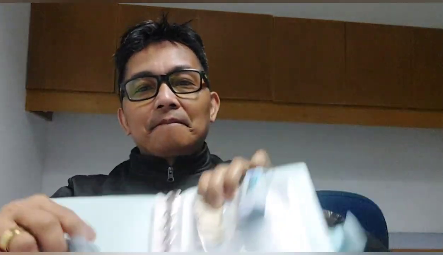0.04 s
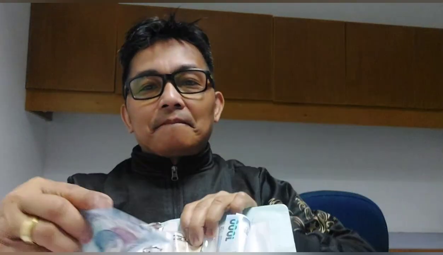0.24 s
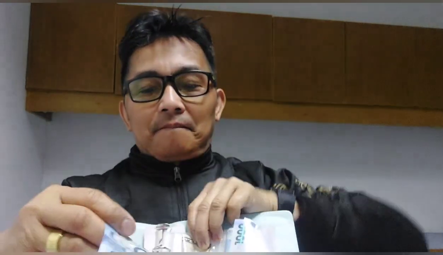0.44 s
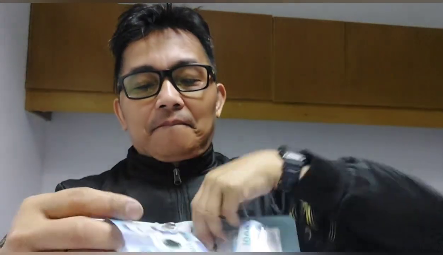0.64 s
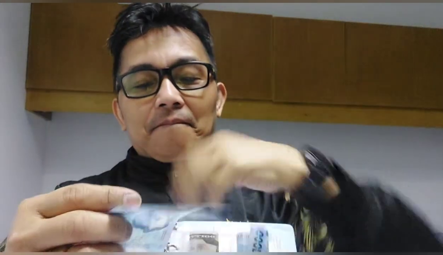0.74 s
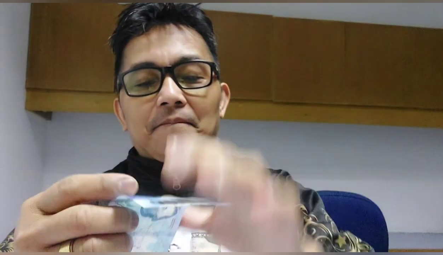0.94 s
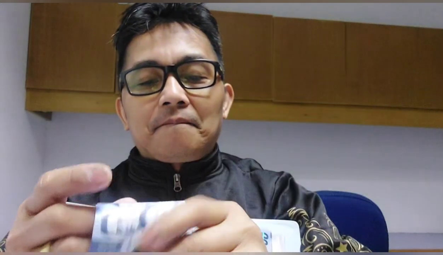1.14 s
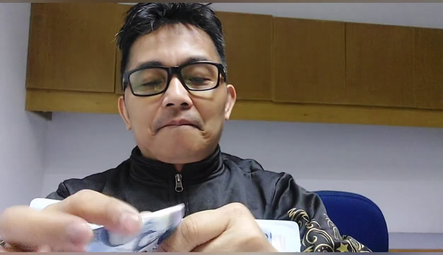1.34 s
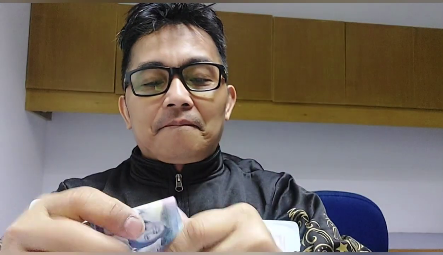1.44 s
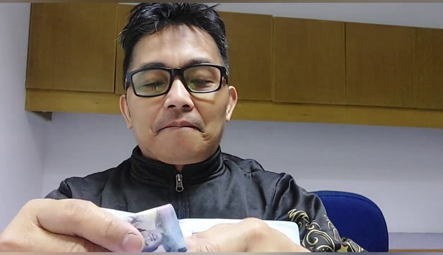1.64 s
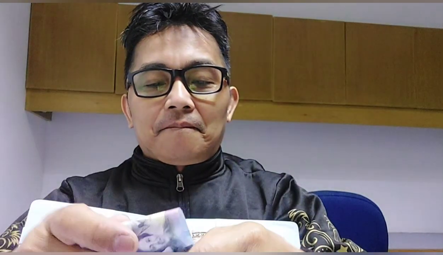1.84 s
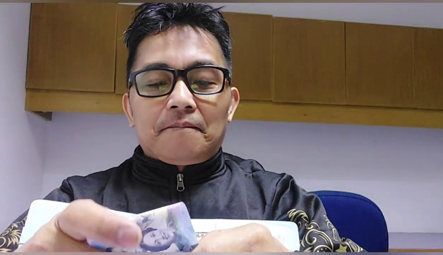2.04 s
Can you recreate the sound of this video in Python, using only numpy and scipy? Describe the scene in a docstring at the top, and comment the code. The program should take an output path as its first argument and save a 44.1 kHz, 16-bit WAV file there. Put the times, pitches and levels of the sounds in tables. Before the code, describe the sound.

Plastic sleeves and a paper banknote crinkle and snap after a binder thuds on a desk

```python
"""Fine crackle of sliding sheets comes first, then a low thud as a binder drops on the desk.
Hands work a banknote and clear plastic pockets in a small room: crackle swells, snaps, scuffs, knocks.
Sheets: random clicks and noise bursts ringing damped modes. Binder: a sagging sine over desk modes.
Ventilation rumble and faint hiss, shaped from random spectra, lie under it all."""
import sys
import numpy as np
from scipy import signal
from scipy.fft import rfft, irfft
from scipy.io import wavfile
from scipy.ndimage import uniform_filter1d

SR = 44100
rng = np.random.default_rng(int(sys.argv[2]) if len(sys.argv) > 2 else 0)


def volts_from_decibels(level):
    """Turn decibel levels (scalar or array-like) into linear amplitude factors."""
    exponent = np.asarray(level, float) / 20
    return 10 ** exponent


def generate_wav(sig):
    """Save sig (samples, or channels by samples) to the path in sys.argv[1] as 16-bit PCM at SR."""
    pcm = np.round(np.clip(np.atleast_2d(sig).T, -1, 1) * 32767).astype(np.int16)
    wavfile.write(sys.argv[1], SR, pcm)


N = 92610


def evened(x):
    """Scale to unit rms."""
    return x / np.sqrt(np.mean(x ** 2) + 1e-20)


def read_curve(points, hz):
    """Interpolate (f/Hz, value) points over log frequency."""
    f, value = np.transpose(points)
    return np.interp(np.log(hz + 1), np.log(f + 1), value)


def add(mix, start_s, sound):
    """Add sound in place from start_s, cut at the end of the mix."""
    part = mix[..., round(start_s * SR):][..., :sound.shape[-1]]
    part += sound[..., :part.shape[-1]]


def partner(a, b, likeness):
    """Second channel: a blended with independent b to the given correlation."""
    return likeness * a + np.sqrt(1 - likeness ** 2) * b


def highpass(x, order, cutoff_hz):
    """Butterworth high-pass."""
    return signal.sosfilt(signal.butter(N=order, Wn=cutoff_hz, btype="high", fs=SR, output="sos"), x)


RING_RISE_S = .0002


def ring(modes, detune, spread_db):
    """Response to one click: damped sines, pitch and level of each drawn anew."""
    hz, db, t60_s = np.transpose(modes)[:, :, None]
    level_chance, pitch_chance = rng.standard_normal((2, len(modes), 1))
    t = np.arange(1024) / SR
    envelope = volts_from_decibels(db + spread_db * level_chance - 60 * t / t60_s)
    sines = np.sin(2 * np.pi * hz * (1 + detune * pitch_chance) * t)
    return (envelope * sines).sum(0) * np.minimum(t / RING_RISE_S, 1)


# Modes of the sheets, low to high: f/Hz, level/dB, t60/s
FLAP_MODES = [(1200, -6, .012), (1410, -1, .016), (1680, 0, .016), (1860, -6, .012)]
PAPER_MODES = [(2320, 0, .015), (2600, -2, .015), (2930, 0, .015), (3350, -4, .012), (3750, -3, .012)]
CREASE_MODES = [(4300, -4, .006), (4900, -3, .005), (5500, -2, .005), (6200, -3, .005), (6900, -4, .005),
                (7700, -5, .004)]
FILM_MODES = [(8540, -6.5, 0.0017), (9670, -5.5, 0.0027), (10680, -4, 0.0023), (11570, -2, 0.0028),
              (12270, 1, 0.0028), (13000, -11, 0.0024), (14700, -1.5, 0.0022), (15460, -3, 0.003)]
# Sliding swells: t/s, paper level/dB, flap re paper/dB, film level/dB
SLIDE_LEVELS = [(0, -50, 3.5, -45), (0.03, -67.5, 3, -67), (0.06, -73.5, -5, -65.5), (0.098, -75, -3, -51),
                (0.123, -48, 0, -48.5), (0.15, -63, 7.5, -61), (0.18, -69, -55, -58.5),
                (0.205, -72, 7, -66), (0.212, -51, -1, -41), (0.24, -52, -8, -54), (0.27, -67.5, 3, -61),
                (0.32, -63.5, -11, -66.5), (0.333, -59, 5, -53), (0.38, -69, 2, -56.5),
                (0.44, -67, 1.5, -65.5), (0.54, -67, 4, -52.5), (0.6, -72, 2, -71), (0.638, -64, 4, -54.5),
                (0.719, -59, -12, -66.5), (0.735, -50, -3, -49), (0.77, -49, -2.5, -61),
                (0.8, -62.5, -2, -67), (0.87, -93, 14, -70.5), (1.01, -81.5, 3, -72), (1.048, -59, -6, -70),
                (1.101, -65.5, 10, -60), (1.113, -48, 1, -57), (1.145, -56, 1.5, -53.5),
                (1.18, -58.5, -6, -59.5), (1.219, -52, 2, -46), (1.25, -49.5, -3, -49),
                (1.279, -58.5, -1, -63), (1.31, -54, 4, -47), (1.339, -45.5, -4, -36.5),
                (1.362, -37, -2.5, -41.5), (1.377, -59, 15, -29.5), (1.398, -43, -48, -49.5),
                (1.44, -65.5, 2, -61), (1.46, -44.5, 2, -50), (1.473, -38, -5, -61), (1.499, -51, -29, -45),
                (1.53, -48, -3, -48), (1.56, -58.5, -23, -51), (1.585, -57.5, -11, -63.5),
                (1.62, -74, 5, -60), (1.66, -63, -11, -73), (1.72, -65, -36, -63.5), (1.8, -60, -5, -56.5),
                (1.84, -52.5, -16, -62.5), (1.9, -59.5, -2, -61.5), (2.0, -58.5, -15, -63),
                (2.04, -62.5, -9, -57.5), (2.1, -59, -57, -69.5)]
# Crackling of flap, paper, creases, film: rate/(clicks/s), spread of sizes/dB
CRACKLE_RATES = [(1200, 4.), (1800, 4.), (5000, 3.), (14000, 1.5)]
CREASE_DB = 1  # re mean of paper and film dB
SLIDE_WIDTH_RAD = 0.59
SPOT_DETUNE, SPOT_SPREAD_DB = .035, 3.


def slide():
    """Dense random crackles at eight spots, each with its own ring and stereo place."""
    t, out = np.arange(N) / SR, np.zeros((2, N))
    s, paper_db, flap_re_paper_db, film_db = np.transpose(SLIDE_LEVELS)
    crease_db = (paper_db + film_db) / 2 + CREASE_DB
    mode_sets = (FLAP_MODES, PAPER_MODES, CREASE_MODES, FILM_MODES)
    levels_db = (paper_db + flap_re_paper_db, paper_db, crease_db, film_db)
    for modes, (rate, spread_db), level_db in zip(mode_sets, CRACKLE_RATES, levels_db):
        swell = volts_from_decibels(np.interp(t, s, level_db))
        for side in np.linspace(-1, 1, 8):
            size = volts_from_decibels(spread_db * np.minimum(rng.exponential(1, N), 6))
            size *= rng.random(N) < rate / 8 / SR  # sparse click times
            clicks = evened(size) * rng.choice([-1., 1.], N) * swell
            tone = ring(modes, SPOT_DETUNE, SPOT_SPREAD_DB)
            heard = signal.oaconvolve(clicks, tone / np.linalg.norm(tone) / 2)[:N]
            angle = np.pi / 4 + SLIDE_WIDTH_RAD * side
            out[0] += np.cos(angle) * heard
            out[1] += np.sin(angle) * np.roll(heard, round(7 * side))  # samples
    return out


# Snaps of the sheets: t/s, level/dB, ring centre f/Hz, film re ring/dB, length/s
SNAPS_OF_SHEETS = [(0.116, -49, 1730, -20, 0.0031), (0.2044, -35, 5160, -4, 0.0048),
                   (.215, -41, 5470, 0, 0.0023), (0.23, -31.5, 5500, -3.5, 0.0021),
                   (0.291, -60, 4000, 12.5, 0.0027), (.325, -56.5, 7560, 17, 0.0029),
                   (0.33, -46.5, 7800, -2, 0.0039), (0.6967, -41, 5970, -22, 0.00095),
                   (.7275, -31.5, 4000, -0.5, 0.001), (.751, -28.5, 4430, 8, 0.0021),
                   (0.7537, -33.5, 3270, 6.5, 0.0028), (0.8458, -43.5, 5500, -15, 0.0025),
                   (0.973, -57, 5500, -12, 0.0028), (1.086, -40.5, 1610, -16, 0.0057),
                   (1.106, -41.5, 1710, 2, 0.0083), (1.134, -36, 1450, -20, 0.0021),
                   (1.2406, -29.5, 2690, -37, 0.005), (1.308, -41, 1980, -16, 0.0018),
                   (1.329, -42, 3000, -10, 0.0072), (1.345, -35, 2600, -25, 0.0021),
                   (1.373, -29, 3000, -2, 0.0071), (1.374, -29, 6300, -4.5, 0.0059),
                   (1.4599, -21, 1860, -38, 0.0032), (1.463, -23.5, 2700, -24, 0.003),
                   (1.4635, -25, 5900, -8, 0.0043), (1.467, -33.5, 1870, -12, 0.0018),
                   (1.488, -53, 1990, 18, 0.0043), (1.5113, -24, 1750, -35, 0.0015),
                   (1.512, -29.5, 2900, -25, 0.0041), (1.525, -37, 2970, 1.5, 0.00067),
                   (1.553, -43.5, 3150, 6.5, 0.003), (1.762, -42, 1270, -29, 0.00096),
                   (1.7626, -45.5, 3400, -36, 0.004), (1.85, -42.5, 3200, -25, 0.0024),
                   (1.8274, -32, 2490, -30, 0.0036), (1.831, -33, 3900, -23, 0.0043)]
SNAP_WIDTH_OCT, SNAP_RISE_S = .42, .001
SNAP_DETUNE, SNAP_SPREAD_DB = .025, 1.5
RING_LIKENESS, FILM_LIKENESS = .65, .2  # left-right, before the ring


def snap(start_s, level_db, centre_hz, film_db, length_s):
    """A short shower of tiny buckles, fading fast, rings the modes near its centre and the film."""
    t = np.arange(800) / SR
    envelope = np.minimum(t / SNAP_RISE_S, 1) * np.exp(-(t / np.clip(length_s, .0005, .012)) ** 4)
    a, b = rng.standard_normal((2, len(t))) * envelope
    near = []
    for hz, db, t60_s in FLAP_MODES + PAPER_MODES + CREASE_MODES:
        octaves = np.log2(hz / centre_hz)
        near.append((hz, db - 6 * (octaves / SNAP_WIDTH_OCT) ** 2, t60_s))
    out = 0
    for modes, db, likeness in ((near, 0, RING_LIKENESS), (FILM_MODES, film_db, FILM_LIKENESS)):
        tone = ring(modes, SNAP_DETUNE, SNAP_SPREAD_DB)
        part = signal.fftconvolve([a, partner(a, b, likeness)], tone[None], axes=1)
        loudest = np.sqrt(2 * uniform_filter1d(part ** 2, 88).max())  # over 2 ms
        out = out + volts_from_decibels(db) * part / loudest
    return start_s, out * volts_from_decibels(level_db)


# Scuffs on the binder cover: t/s, level/dB, decay constant/s
COVER_SCUFFS = [(0.118, -54, 0.069), (0.208, -47.5, 0.078), (0.249, -54.5, 0.084), (0.728, -46.5, 0.019),
                (0.75, -42.5, 0.018), (0.801, -52, 0.029), (1.199, -50, 0.059), (1.346, -51.5, 0.033),
                (1.458, -42, 0.026), (1.471, -64, 0.035)]
# Cover modes: f/Hz, level/dB, t60/s
COVER_MODES = [(432, 3, 0.021), (500, 2.5, 0.017), (673, -1, 0.019), (830, -4, 0.011)]


def scuff(start_s, level_db, decay_s):
    """A brief rub, quick to start and slow to fade, sounds in the low modes of the cover."""
    t = np.arange(0, 2 * decay_s, 1 / SR)
    rub = rng.standard_normal((2, 8000))[:, :len(t)] * np.minimum(t / .002, 1) * np.exp(-t / decay_s)
    tone = ring(COVER_MODES, 0.032, 1.7)
    tone = tone / np.linalg.norm(tone)
    stereo_rub = [rub[0], partner(rub[0], rub[1], RING_LIKENESS)]
    return start_s, volts_from_decibels(level_db) * signal.fftconvolve(stereo_rub, tone[None], axes=1)


# Knocks on the desk: t/s, binder level/dB, binder starting f/Hz, desk level/dB
DESK_KNOCKS = [(0.2074, -20.5, 152.4, -33), (0.244, -48, 147, -32.5), (.272, -31, 178.4, -42),
               (.345, -44.5, 153, -38), (.368, -46, 229, -41), (.668, -42.5, 141.8, -46),
               (0.753, -44, 213, -44), (.808, -48, 147, -41), (1.204, -43.5, 149, -47),
               (1.835, -42, 150, -50.5), (1.464, -43, 223.7, -45)]
# Desk-top modes: f/Hz, level/dB, t60/s
DESK_MODES = [(52.3, -11, 0.73), (62.2, 2, 0.24), (118.44, 2, 0.38), (207, -9, 0.16), (244.5, -8, 0.18),
              (288.8, -9, 0.18), (356.8, -8, 0.17)]
BINDER_SAG_PER_S = 2.4  # pitch falls as the cushion of air empties
BINDER_T60_S, KNOCK_RISE_S, DESK_RISE_S = 0.21, 0.0015, 0.0117


def knock(start_s, binder_db, binder_hz, desk_db):
    """The binder's air cushion thumps with sagging pitch and the desk top swells into a low ring."""
    t = np.arange(0, .5, 1 / SR)
    cycles = binder_hz * np.cumsum(np.exp(-BINDER_SAG_PER_S * t)) / SR
    binder = volts_from_decibels(binder_db - 60 * t / BINDER_T60_S) * np.sin(2 * np.pi * cycles)
    desk = 0
    for hz, db, t60_s in DESK_MODES:
        desk = desk + volts_from_decibels(desk_db + db - 60 * t / t60_s) * np.sin(2 * np.pi * hz * t)
    return start_s, np.minimum(t / KNOCK_RISE_S, 1) * binder + np.minimum(t / DESK_RISE_S, 1) * desk


# Ventilation and hiss spectrum: f/Hz, relative density/dB
AIR_SPECTRUM = [(12, -59), (20, 12), (38, -17.5), (114, 1), (174, -10), (200, -3), (230, -6.5), (372, -11),
                (551, -22.5), (2060, -40), (2890, -40), (3720, -43), (4530, -75), (5070, -38),
                (11100, -44.5), (15200, -47), (16500, -50)]
# Left-right likeness of the air: f/Hz, correlation/1
AIR_LIKENESS = [(60, 0.88), (240, 0.89), (950, 0.23), (3770, 0.046), (15000, 0.025)]
# Rumble while hands press on the desk: t/s, relative level/dB
RUMBLE_LEVELS = [(0, 4.5), (.15, -7.5), (.5, 0.5), (.75, -4), (.88, -2.5), (1., -5.5), (1.1, -1),
                 (1.22, -2), (1.4, -1), (1.5, 2), (1.7, -1.5), (2.1, -1.5)]
AIR_RMS_DB, RUMBLE_TOP_HZ, PATCH_DB = -49, 700, 1.1


def air():
    """Ventilation rumble and hiss: random short-time spectra with slow patches."""
    frames, hz = N // 512 + 5, np.fft.rfftfreq(2048, 1 / SR)
    a, b, c, d, patches = rng.standard_normal((frames, 1025, 5)).T
    patches = evened(uniform_filter1d(uniform_filter1d(patches, 10, 0), 8, 1))
    likeness = np.clip(read_curve(AIR_LIKENESS, hz), -1, 1)[:, None]
    left = a + 1j * b
    z = np.array([left, partner(left, c + 1j * d, likeness)])
    rumble_db = np.interp(np.arange(frames) * 512 / SR, *np.transpose(RUMBLE_LEVELS))
    rumble_db = (hz < RUMBLE_TOP_HZ)[:, None] * rumble_db
    z *= volts_from_decibels(read_curve(AIR_SPECTRUM, hz)[:, None] + rumble_db + PATCH_DB * patches)
    noise = signal.istft(z, nperseg=2048, noverlap=1536)[1][:, :N]
    return volts_from_decibels(AIR_RMS_DB) * evened(noise)


# Room decay: f/Hz, t60/s
ROOM_DECAY = [(100, 0.29), (1000, 0.2), (4000, 0.18), (12000, 0.14)]


def room(x):
    """Reverberation: sparse taps of random sign, each band dying at its own speed."""
    taps = np.zeros((2, SR // 2))
    at = np.arange(160, SR // 2 - 20, 20)
    at = at + rng.integers(0, 20, (2, len(at)))
    np.put_along_axis(taps, at, rng.choice([-1., 1.], at.shape), 1)
    hz, t, z = signal.stft(taps, SR, nperseg=256)
    decay = volts_from_decibels(-60 * t / read_curve(ROOM_DECAY, hz)[:, None])
    tail = signal.istft(z * decay, SR, nperseg=256)[1]
    return signal.fftconvolve(x, tail / np.linalg.norm(tail[0]), axes=1)[:, :N]


SHEET_LOW_HZ = 967  # sheets this small radiate little below here
SHEET_ROOM_DB, DESK_ROOM_DB = -10.5, -15


def scene():
    """Sum sheets, scuffs and knocks, their room tails, and the air."""
    sheets, desk = slide(), np.zeros(N)
    for row in SNAPS_OF_SHEETS:
        add(sheets, *snap(*row))
    sheets = highpass(sheets, 4, SHEET_LOW_HZ)
    for row in COVER_SCUFFS:
        add(sheets, *scuff(*row))
    for row in DESK_KNOCKS:
        add(desk, *knock(*row))
    sheets_wet = sheets + volts_from_decibels(SHEET_ROOM_DB) * room(sheets)
    desk_wet = desk + volts_from_decibels(DESK_ROOM_DB) * room(desk[None])
    return sheets_wet + desk_wet + air()


def band_limit(x):
    """A steep low-pass at the top of the band."""
    return signal.sosfilt(signal.butter(12, 16820, fs=SR, output="sos"), x)


# Microphone port balance: f/Hz, left minus right/dB
PORT_BALANCE_DB = [(100, -.3), (300, 1.2), (2500, 1.), (6000, -1.4), (13000, -3.4)]
MIC_LOW_HZ, EDGE_HZ = 41.3, 16000


def record(dry):
    """Two microphone ports with slightly different response, then a band limit."""
    hz = np.fft.rfftfreq(N, 1 / SR)
    dry = highpass(dry, 5, MIC_LOW_HZ)
    gain = volts_from_decibels(read_curve(PORT_BALANCE_DB, hz) * np.array([[.5], [-.5]]))
    ports = irfft(rfft(dry, axis=1) * gain, N, axis=1)
    lowpass = signal.firwin(255, EDGE_HZ, window=("kaiser", 8), fs=SR)
    mix = signal.oaconvolve(ports, lowpass[None], "same")
    return band_limit(mix)


dry = scene()
out = record(dry)
generate_wav(out)
```